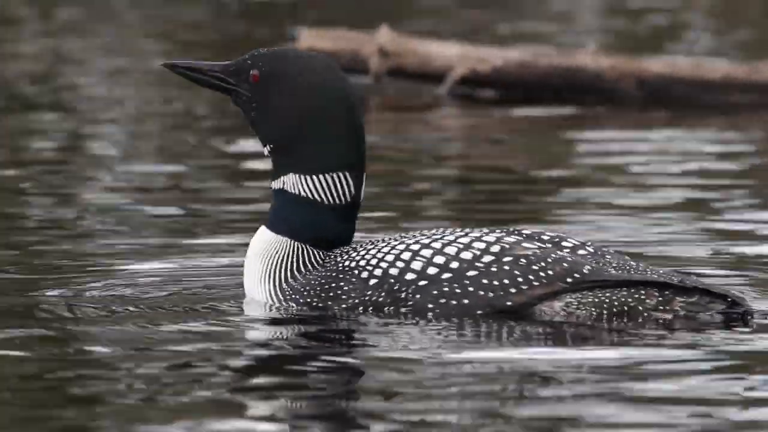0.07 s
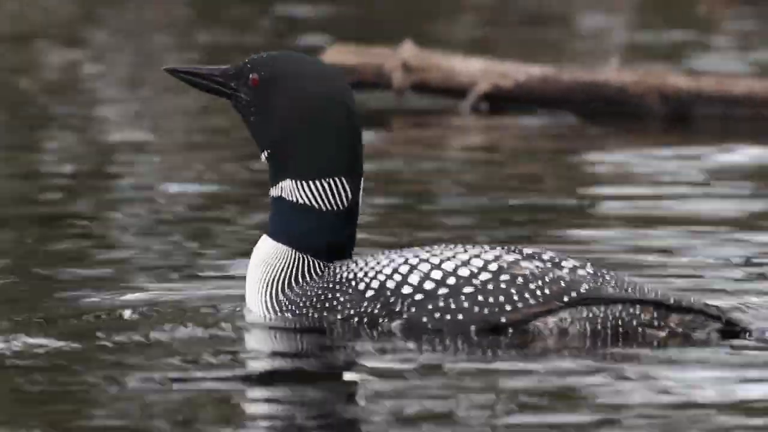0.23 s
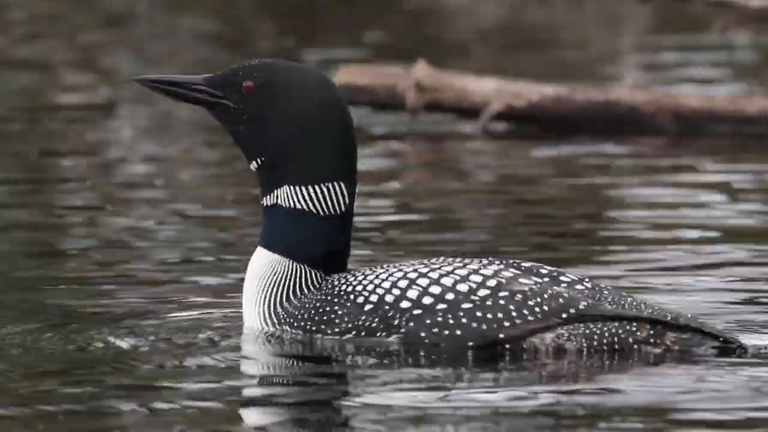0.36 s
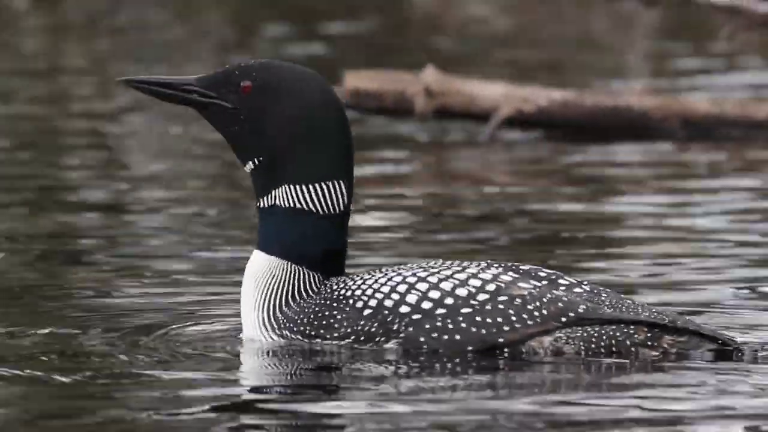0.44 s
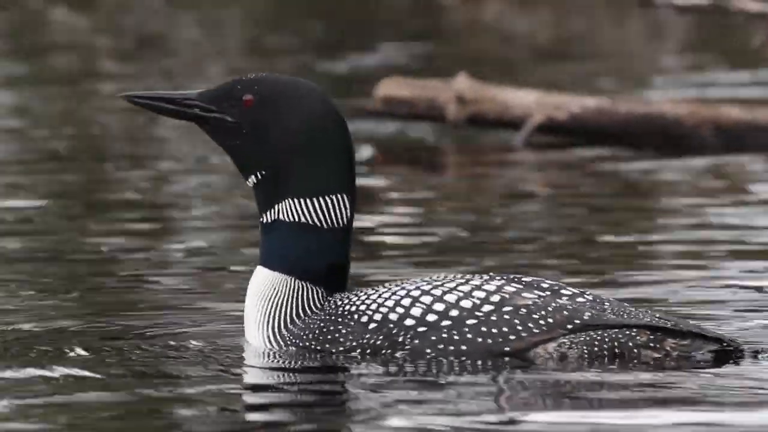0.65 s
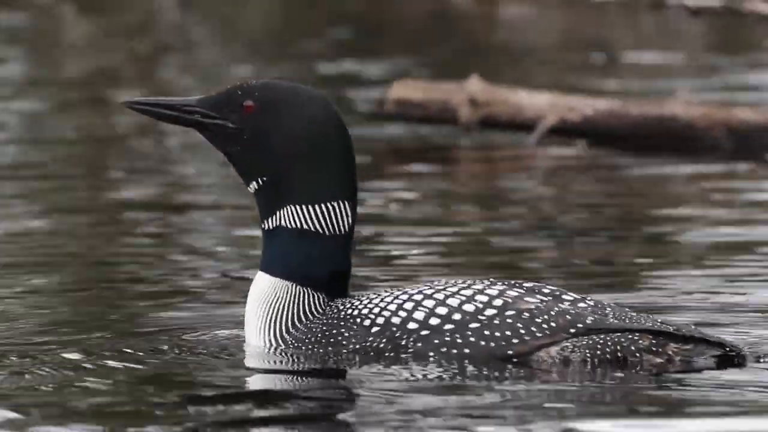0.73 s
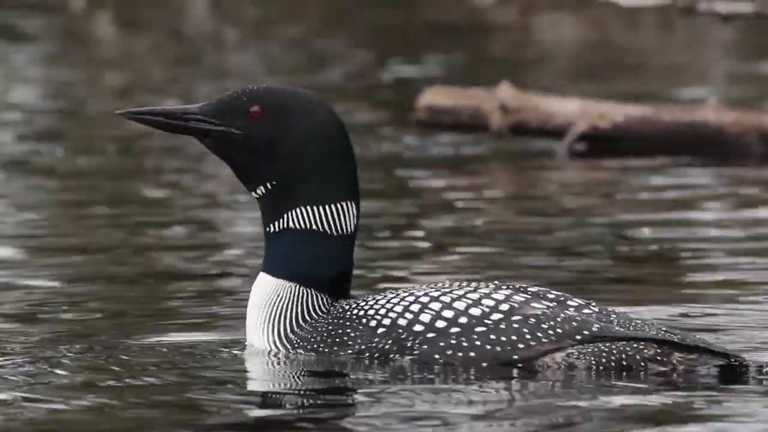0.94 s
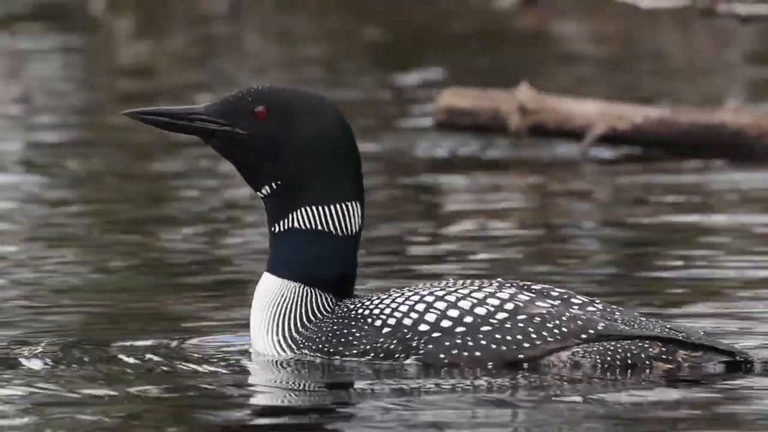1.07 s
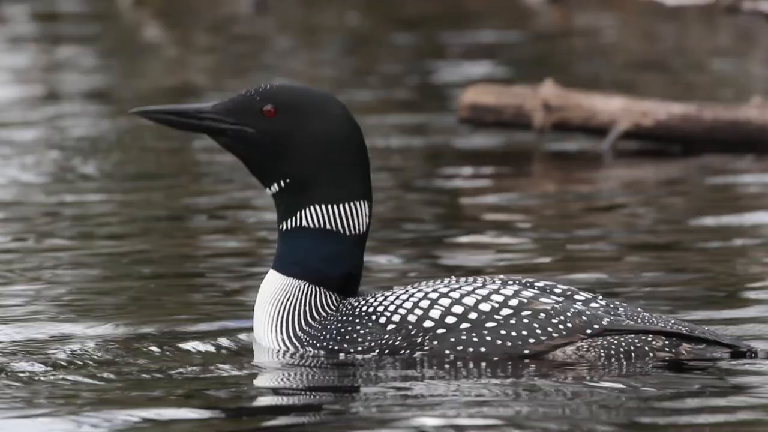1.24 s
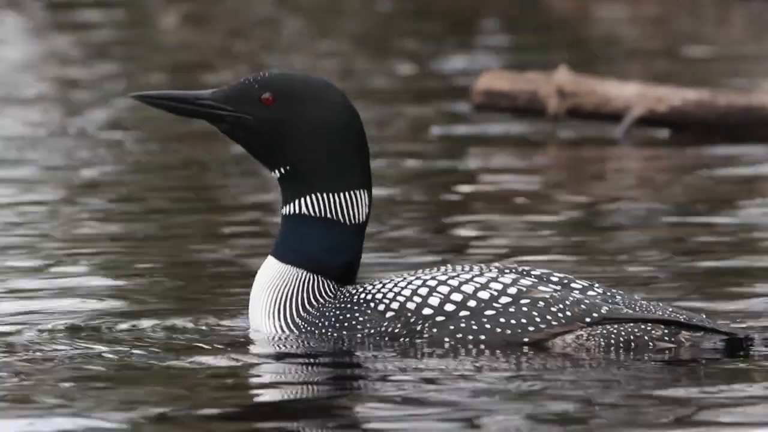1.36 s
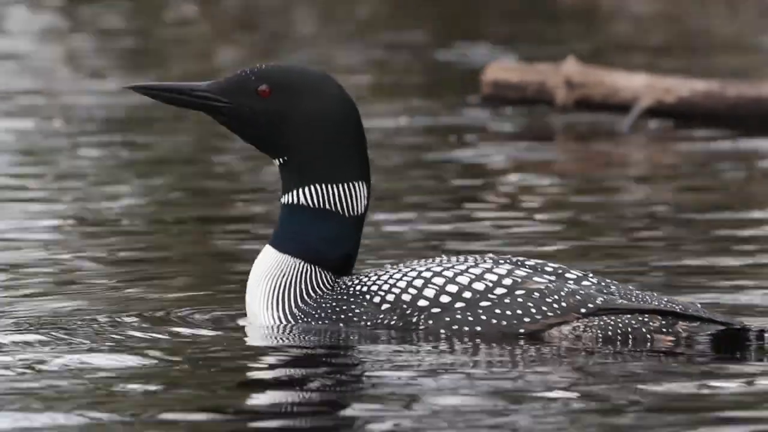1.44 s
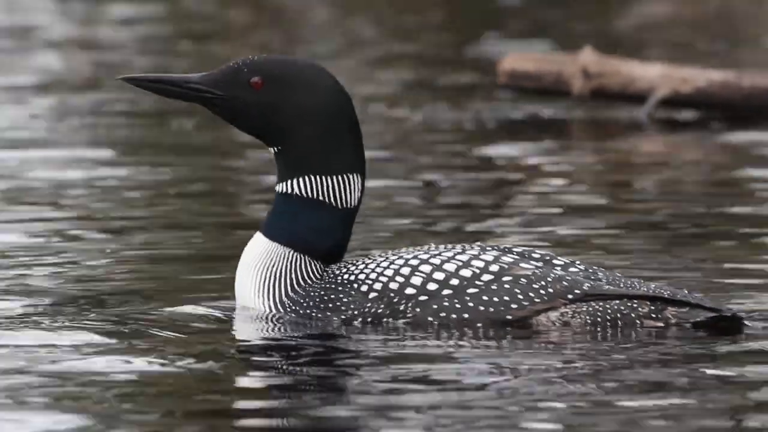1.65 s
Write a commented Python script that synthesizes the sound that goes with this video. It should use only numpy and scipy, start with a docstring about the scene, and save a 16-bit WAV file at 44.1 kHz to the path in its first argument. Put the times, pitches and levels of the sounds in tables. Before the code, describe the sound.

Single howling loon call rises in sudden breaks, holds high, falls, and echoes faintly off wooded shore.

```python
"""A loon on a quiet lake wails: its voice climbs through three registers with sudden breaks, holds a fluttering,
near-pure high note and drops back into a fourth. One oscillator drives all its partials, which shimmer, rasp and
slip; breath noise hisses along with the voice. The near bank and the far wooded shore echo the call by convolution
with decaying noise and two distinct returns, and shaped noise makes a faint wind in trees and over the water."""
import sys
import numpy as np
from scipy import signal
from scipy.fft import rfft, irfft
from scipy.io import wavfile
from scipy.ndimage import uniform_filter1d

SR = 44100
rng = np.random.default_rng(int(sys.argv[2]) if len(sys.argv) > 2 else 0)


def to_wav(sig):
    """Store sig (one row per channel, or 1-D mono) as 16-bit WAV at the path in sys.argv[1].

    Samples outside -1..1 are clipped; the rate is SR.
    """
    pcm = np.clip(np.atleast_2d(sig), -1, 1) * 32767
    pcm = np.round(pcm).astype(np.int16)
    wavfile.write(sys.argv[1], SR, pcm.T)  # frames by channels


def decibels_to_gain(level_db):
    """Convert a level in decibels to a linear amplitude gain (20 dB per decade)."""
    exponent = np.asarray(level_db, float) / 20
    return 10 ** exponent


N = 74970  # samples, 1.7 s


def walk(rate):
    """Smooth random wander of spread 1, averaged twice over 1 / rate seconds."""
    k = max(int(SR / rate), 1)
    w = uniform_filter1d(uniform_filter1d(rng.standard_normal(N), k), k)
    return w / w.std()


def unit(x):
    """Scale to rms 1."""
    return x / np.sqrt(np.mean(x ** 2))


def coloured(points):
    """Noise of rms 1 whose spectrum follows (Hz, dB) points joined along log frequency."""
    p = np.array(points)
    hz = np.arange(N // 2 + 1) * SR / N + 1
    gain = decibels_to_gain(np.interp(np.log(hz), np.log(p[:, 0]), p[:, 1]))
    return unit(irfft(rfft(rng.standard_normal(N)) * gain, N))


def curve(points):
    """Columns of a table joined by straight lines in time."""
    c = np.array(points, float)
    return [np.interp(np.arange(N) / SR, c[:, 0], col) for col in c.T[1:]]


def wind():
    """Faint wind in trees and over water: shaped noise that swells a little."""
    # Spectrum of the wind. Each row: frequency in Hz, relative density in dB per Hz.
    wind_spectrum = [(18, -46), (30, -27.5), (165, -8.5), (330, -4.5), (480, -5), (815, -11.5),
                     (1100, -12.5), (1500, -5.5), (1650, -11.5), (1850, -22), (2260, -18.5), (2600, -21.5),
                     (5000, -27.5), (15700, -32.5)]
    gust_db, flicker_db = .5, .6
    level_db = -63.5 + gust_db * walk(2) + flicker_db * walk(3.6)
    return coloured(wind_spectrum) * decibels_to_gain(level_db)


def bank_echo():
    """Impulse response of the near bank: a short scatter of dense, decaying reflections."""
    t60_s, energy_db = .3, -22
    t = np.arange(N) / SR
    bank = rng.standard_normal(N) * decibels_to_gain(-60 * t / t60_s) * (t > .004)  # first return after 4 ms
    return decibels_to_gain(energy_db) * bank / np.sqrt(np.sum(bank ** 2))


def shore_echo():
    """Impulse response of the far wooded shore: a late diffuse wash and distinct slaps, all dulled."""
    # Distinct returns from tree lines. Each row: delay in seconds, level in dB ahead of the low-pass.
    slaps = [(.74, -32.5), (1.1, -35)]
    start_s, rise_s, t60_s = .35, .15, 4
    wash_db, dull_hz = -35.5, 1500  # the wash level is its energy ahead of the low-pass
    late = np.maximum(np.arange(N) / SR - start_s, 0)
    shore = rng.standard_normal(N) * (1 - np.exp(-late / rise_s)) * decibels_to_gain(-60 * late / t60_s)
    shore = decibels_to_gain(wash_db) * shore / np.sqrt(np.sum(shore ** 2))
    for delay_s, db in slaps:
        shore[int(delay_s * SR)] += decibels_to_gain(db)
    return signal.sosfilt(signal.butter(2, dull_hz, fs=SR, output="sos"), shore)


def echoes(x):
    """The call as the near bank and the far shore return it."""
    return signal.fftconvolve(x, bank_echo() + shore_echo())[:N]


def breath(env):
    """Air hissing in the throat: shaped noise that follows the voice's envelope and flickers in level."""
    # Spectrum of the breath. Each row: frequency in Hz, relative density in dB per Hz.
    breath_spectrum = [(300, -32.5), (800, 10), (1100, 9), (2000, -4.5), (3000, -15), (5000, -12),
                       (7000, -15), (10000, -8.5), (13000, -27.5), (16000, -23)]
    level_db = -38 + 1.2 * walk(33)  # against the fundamental
    return coloured(breath_spectrum) * decibels_to_gain(level_db) * env


def high_note_flutter():
    """Uneven flutter of the high note: its two parts shake level and phase, leaning to an upper sideband."""
    side_hz, side_db = 78, -27
    span_s = (.45, .88, 1.25)  # start, peak, end
    swell = np.interp(np.arange(N) / SR, span_s, [0, 1, 0]) * decibels_to_gain(side_db + 3 * walk(20))
    uneven_hz = side_hz * (1 + .06 * walk(15))
    return swell * np.exp(2j * np.pi * np.cumsum(uneven_hz) / SR)


def voice_phase(rows, flutter):
    """One oscillator runs through all registers, so its pitch snaps across each break without a gap."""
    wobble = walk(90)
    wobble = wobble - uniform_filter1d(wobble, size=SR // 15)  # only the fast jitter stays
    (pitch_hz,) = curve([row[:2] for row in rows])
    return 2 * np.pi * np.cumsum(pitch_hz * (1 + .0012 * wobble)) / SR + flutter.imag


def partial(k, phase):
    """Partial k, amplitude near 1: it shimmers, drifts, rasps and now and then slips half a cycle and dips."""
    # Rasp of the partials from the third up. Each row: time in seconds, share from 0 to 1.
    rasp_share = [(.1, .1), (.42, .15), (.44, .55), (.46, .3), (.5, .15), (.6, .25), (.76, .3), (.87, .5),
                  (.95, .28), (1.05, .3), (1.15, .15), (1.5, .15)]
    slip_rate, slip_s = 14, .004  # slips a second at full rasp; smoothing of each slip in seconds
    shimmer_db, drift_db = 1.2, .3  # drift grows by this for each partial above the third
    (rough,) = curve(rasp_share)
    rasp = 1 + rough * (walk(260) + 1j * walk(260)) / np.sqrt(2)
    slip_count = np.cumsum(rng.random(N) < slip_rate * rough / SR)
    slips = uniform_filter1d(np.cos(np.pi * slip_count), int(slip_s * SR))
    tone = np.exp(1j * (k * phase + rng.uniform(0, 2 * np.pi)))
    tone = rasp * slips * tone / np.sqrt(1 + rough ** 2)
    level_db = shimmer_db * walk(28) + drift_db * (k - 3) * walk(9)
    return decibels_to_gain(level_db) * tone.imag


def register(rows, shapes, shape, phase):
    """One register: partials of the shared phase, weighted by a moving throat shape; returns sound and envelope."""
    # Level of the third partial. Each row: time in seconds, level in dB.
    third_level = [(.105, -76), (.135, -59), (.165, -63), (.185, -69), (.198, -85), (.244, -69.5),
                   (.278, -63.5), (.286, -94), (.35, -88), (.4, -65.5), (.44, -62), (.447, -64), (.48, -61),
                   (.6, -56.5), (.72, -52), (.762, -56.5), (.812, -50.5), (.868, -59.5), (.916, -53),
                   (1.0, -57.5), (1.047, -66), (1.051, -57), (1.17, -56.5), (1.3, -60), (1.335, -64),
                   (1.352, -70), (1.36, -70.5), (1.41, -71), (1.44, -85)]
    break_s = .002  # fade at either end
    t = np.arange(N) / SR
    _, db, second_db, upper_db = curve(rows)
    fade_in = np.clip((t - rows[0][0]) / break_s + 1, 0, 1)
    fade_out = np.clip((rows[-1][0] - t) / break_s + 1, 0, 1)
    gate = fade_in * fade_out
    first = decibels_to_gain(db) * np.sin(phase)
    second = decibels_to_gain(second_db) * np.sin(2 * phase + rng.uniform(0, 2 * np.pi))
    third = decibels_to_gain(curve(third_level)[0]) * partial(3, phase)
    # the throat shape slides between neighbouring lists of partial levels
    gains = [decibels_to_gain(np.interp(shape, range(len(shapes)), dbs)) for dbs in zip(*shapes)]
    upper = sum(gain * partial(k, phase) for k, gain in enumerate(gains, 4))
    upper = upper / np.sqrt(sum(gain ** 2 for gain in gains)) * decibels_to_gain(upper_db)
    return np.sqrt(2) * gate * (first + second + third + upper), gate * decibels_to_gain(db)


def loon():
    """Four registers of one voice in turn, with breath and the high note's flutter, through a throat high-pass."""
    # The registers, in order of time. Each row: time in seconds, pitch in Hz, fundamental in dB,
    # second partial in dB, partials from the fourth up together in dB.
    onset_rows = [(0.105, 361, -65.5, -71.5, -77.5), (0.115, 379, -48.5, -53.5, -74),
                  (0.135, 416, -50.5, -49, -72), (0.161, 451, -45.5, -49, -78),
                  (0.179, 502.6, -50.5, -53, -79.5), (0.185, 510.5, -46, -51.5, -75.5),
                  (0.193, 547, -50, -61, -76), (0.198, 607, -42, -51, -84.5)]
    low_rows = [(0.2, 655, -41.5, -59, -82), (0.21, 658, -38.5, -54.5, -74),
                (0.276, 700, -36.5, -51.5, -71), (0.284, 716, -35.5, -51, -76),
                (0.296, 720.9, -33.5, -49, -69.5), (0.366, 750, -31.5, -46.5, -64),
                (0.42, 772, -34.5, -47, -61), (0.436, 793, -30, -46.5, -59), (0.4405, 812, -28.5, -46, -59),
                (0.4425, 860, -29.5, -49, -64)]
    high_rows = [(0.4445, 980, -30, -58, -68), (0.4465, 925, -27, -62, -60), (0.45, 945, -28.5, -61, -66),
                 (0.46, 925, -29, -61, -63), (0.5, 951.6, -26.5, -59.5, -58), (0.53, 963, -26.5, -60, -57),
                 (0.585, 967, -25, -61, -56), (0.6, 981, -23, -58, -56), (0.62, 979, -24.5, -57, -55),
                 (0.7, 990, -22.5, -54, -54), (0.76, 986, -24, -54, -54), (0.78, 995, -24, -54, -53),
                 (0.82, 989, -25, -54, -53), (0.86, 979, -24, -54, -53), (0.9, 985, -22.5, -55, -53),
                 (0.988, 978, -23.5, -54, -56), (1.02, 963, -26.5, -55, -56), (1.05, 960, -26, -56, -54),
                 (1.082, 970.5, -25, -57, -54), (1.12, 960, -26, -57, -54), (1.16, 955, -26, -59, -54),
                 (1.2, 942, -27, -59.5, -56), (1.28, 941, -26, -61, -62), (1.312, 929, -27, -66, -72),
                 (1.334, 925, -28.5, -67, -74), (1.345, 917, -31.5, -70, -76), (1.35, 905, -35, -75, -78),
                 (1.353, 880, -46, -70, -80)]
    fall_rows = [(1.355, 830, -30, -46, -75), (1.358, 700, -38, -45, -62), (1.361, 735, -33, -45.5, -61),
                 (1.374, 718, -34, -47, -62.5), (1.402, 694, -37, -48.5, -64), (1.43, 652.4, -36, -48, -80),
                 (1.446, 625, -42, -48, -86), (1.458, 622, -44, -58, -87), (1.468, 626, -51, -85, -89),
                 (1.475, 630, -65, -85, -89)]
    # Throat shapes. Each list: relative levels in dB of partials 4, 5, 6, ..
    onset_partials = [0]
    low_a = [-6.5, -5, -16, -22, -24, -12.5, -35.5, -32.5, -24, -24, -27, -33, -30]
    low_b = [-46, -39.5, -39, -56.5, -42, -33.5, -54.5, -48.5, -38.5, -52, -44, -49.5, -54]
    low_end = [-50, -37.5, -43, -49.5, -30, -52.5, -46.5, -47, -53.5, -53, -46, -55.5, -64]
    high_early = [-39.5, -34, -52.5, -30, -37.5, -48, -47.5, -64, -51.5, -65.5, -63.5, -54.5, -67.5]
    high_a = [-36.5, -42, -55, -36.5, -42, -48.5, -50, -51, -59.5, -64.5, -66.5, -66, -69]
    high_mid = [-46, -39, -59, -36, -40.5, -45.5, -51, -50.5, -57.5, -66, -63, -65, -59.5]
    high_b = [-45.5, -36.5, -69.5, -27.5, -40, -40.5, -31.5, -59.5, -51, -53.5, -58.5, -62.5, -42.5]
    high_end = [-55, -50.5, -55.5, -48, -71.5, -54, -48.5, -56.5, -46.5, -63.5, -63.5, -69, -74.5]
    fall_partials = [-38, -41.5, -35, -40, -57, -40, -33.5, -52.5, -45, -35, -36, -53, -47]
    # Motion between throat shapes. Each row: time in seconds, place in the register's series of shapes from 0.
    low_motion = [(.2, 0), (.28, 0.19), (.295, 1), (.42, 1), (.438, 1.3)]
    high_motion = [(.45, 0.5), (.56, 0.38), (.64, 0.85), (.84, 1.3), (.93, 2.08), (1.0, 2), (1.04, 2.3),
                   (1.24, 3.3), (1.32, 3.9)]
    flutter = high_note_flutter()
    phase = voice_phase(onset_rows + low_rows + high_rows + fall_rows, flutter)
    low_shapes = [low_a, low_b, low_end]
    high_shapes = [high_early, high_a, high_mid, high_b, high_end]
    parts = [register(onset_rows, [onset_partials], 0, phase),
             register(low_rows, low_shapes, curve(low_motion)[0], phase),
             register(high_rows, high_shapes, curve(high_motion)[0], phase),
             register(fall_rows, [fall_partials], 0, phase)]
    voice = sum(sound for sound, _ in parts)
    env = sum(envelope for _, envelope in parts)
    throat = signal.butter(2, 280, "high", fs=SR, output="sos")
    return signal.sosfilt(throat, voice * (1 + flutter.real) + breath(env))


def scene():
    """Bird, its echoes and the wind at one microphone."""
    bird = loon()
    return (bird + echoes(bird) + wind())[None, :]


def top_cut(x):
    """Nothing passes above the cut-off."""
    return signal.sosfilt(signal.butter(12, 15890, fs=SR, output="sos"), x)


def record(dry):
    """The finished mix as the camera keeps it."""
    return top_cut(dry)


dry = scene()
out = record(dry)
to_wav(out)
```